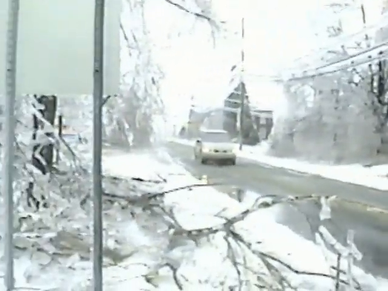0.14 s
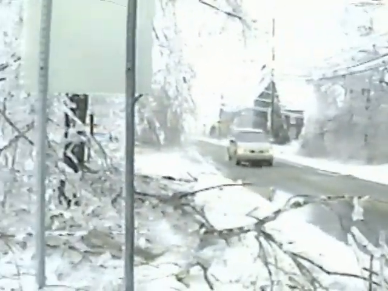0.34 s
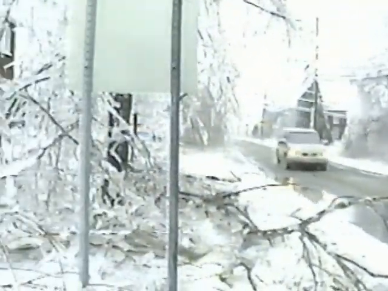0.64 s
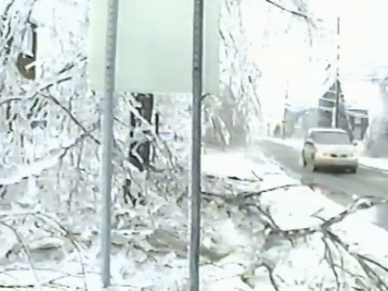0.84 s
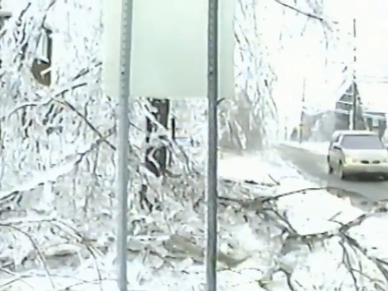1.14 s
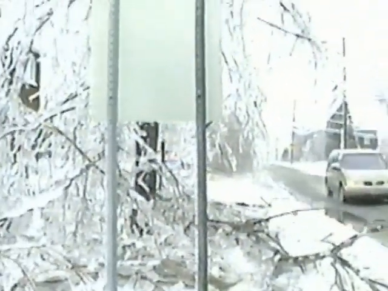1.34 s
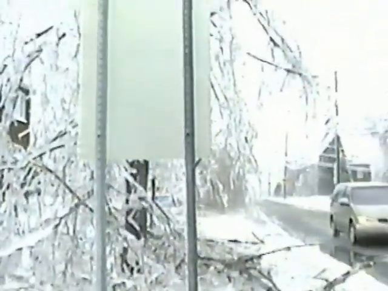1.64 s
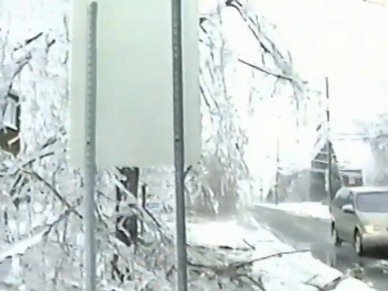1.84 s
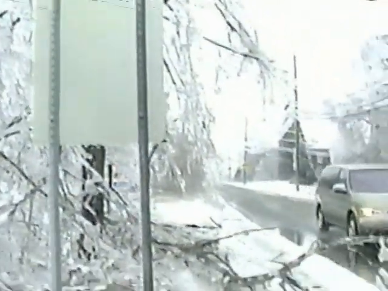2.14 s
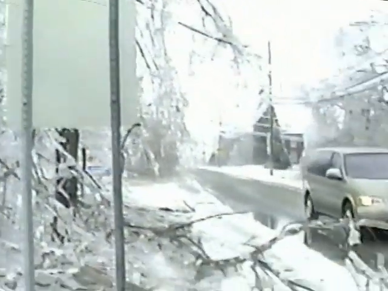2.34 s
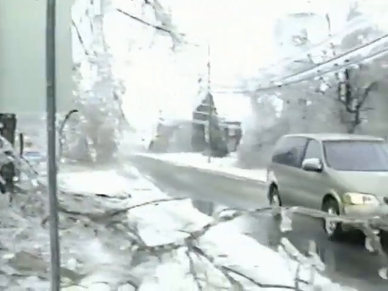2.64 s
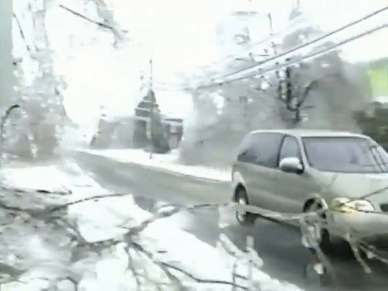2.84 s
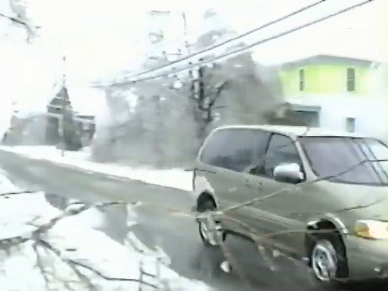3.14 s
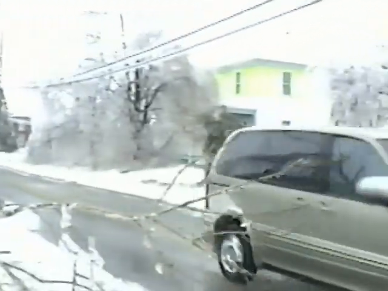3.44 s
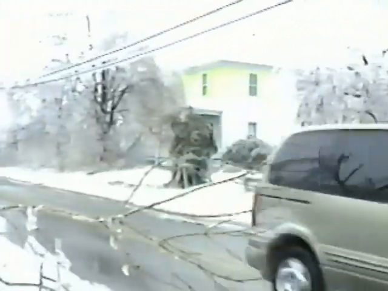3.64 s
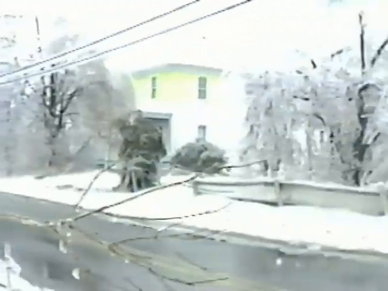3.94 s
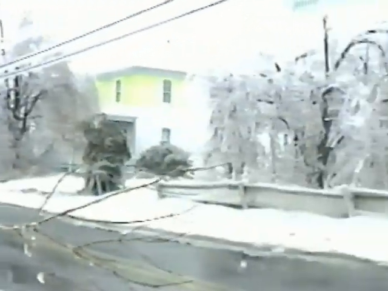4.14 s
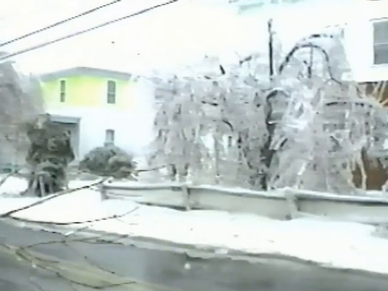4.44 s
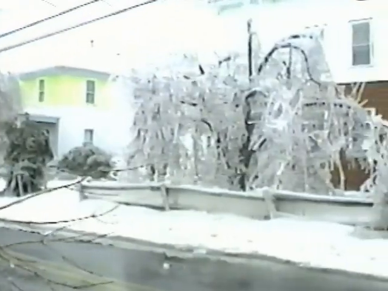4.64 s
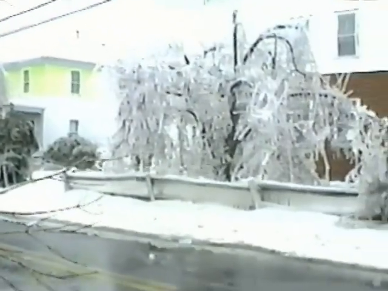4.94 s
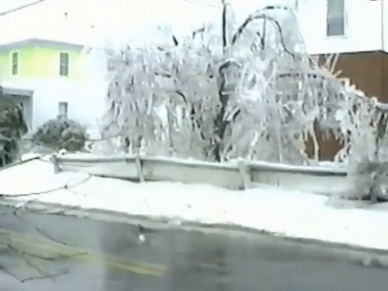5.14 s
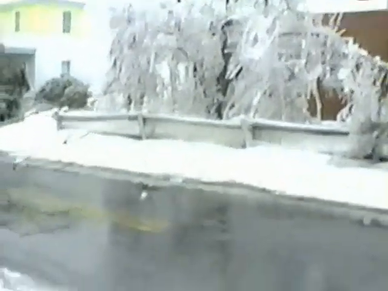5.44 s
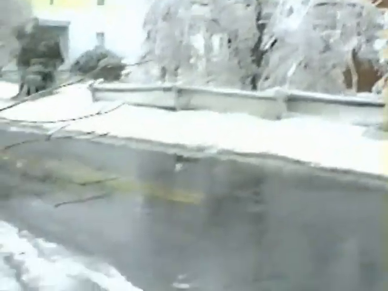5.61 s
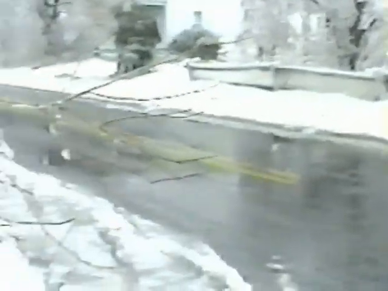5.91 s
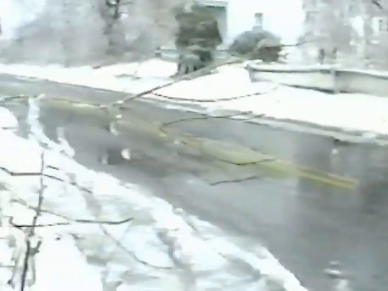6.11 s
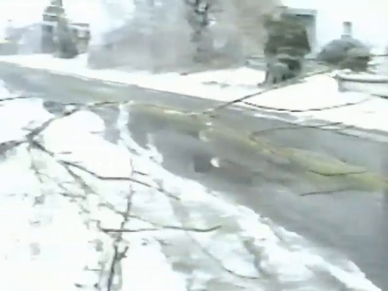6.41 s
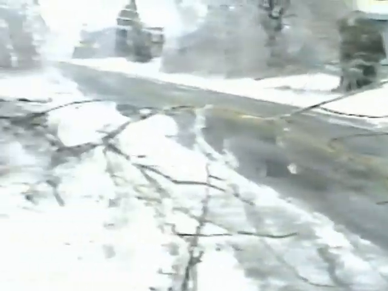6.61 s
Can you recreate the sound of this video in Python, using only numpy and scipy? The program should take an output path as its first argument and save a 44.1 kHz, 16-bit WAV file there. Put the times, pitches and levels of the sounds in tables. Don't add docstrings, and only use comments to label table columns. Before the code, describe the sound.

Wet tyre roar, thrown slush and fine spray rush by at the roadside, while fingers knock a hollow camera body over faint tape buzz.

```python
import sys
import numpy as np
from scipy import signal
from scipy.fft import rfft, irfft, next_fast_len
from scipy.io import wavfile
from scipy.ndimage import uniform_filter1d, map_coordinates

SR = 44100
rng = np.random.default_rng(int(sys.argv[2]) if len(sys.argv) > 2 else 0)


def int16_out(signal):
    q = np.round(np.clip(np.atleast_2d(signal).T, -1, 1) * 32767)
    wavfile.write(sys.argv[1], SR, q.astype(np.int16))


def magnitude_from_level(level_db):
    exponent = np.asarray(level_db, float) / 20
    return 10 ** exponent


N = 298557


def unit(x):
    return x / np.sqrt(np.mean(x ** 2) + 1e-20)


def along(points, hz):
    f, v = np.transpose(points)
    return np.interp(np.log(hz + 1), np.log(f + 1), v)


def wobble(rate):
    knots = rng.standard_normal(int(N * rate / SR) + 4)
    return map_coordinates(knots, [np.arange(N) * rate / SR])


def filtered(x, response):
    m = next_fast_len(N + 8192)
    return irfft(rfft(x, m) * response(np.fft.rfftfreq(m, 1 / SR)), m)[..., :N]


# multiple of the mains frequency, level in dB rms.
HUM_LINES = [(1, -77), (9, -97), (10, -93), (11, -90), (12, -95), (15, -94), (19, -95)]


def mains_hum():
    t = np.arange(N) / SR
    return sum(np.sqrt(2) * magnitude_from_level(db) * np.sin(2 * np.pi * 60.05 * k * t + k) for k, db in HUM_LINES)


# frequency in Hz, density in dB per Hz.
HISS_COLOUR = [(100, -6), (3000, -10), (9000, -4), (12000, -5), (13500, -4), (15000, -30)]


def tape_hiss():
    white = rng.standard_normal(N)
    return magnitude_from_level(-63.5) * unit(filtered(white, lambda hz: magnitude_from_level(along(HISS_COLOUR, hz))))


# frequency in Hz, level in dB rms.
BUZZ_ENVELOPE = [(6000, -95), (8500, -74), (11000, -78), (12700, -79), (13500, -83)]


def head_buzz():
    field_hz, flutter_s = 59.94, 6e-6
    t = np.arange(N) / SR + flutter_s * wobble(12)
    k = np.arange(58, 114)
    line_hz = 2 * k * field_hz
    weak_db = -11 * (k % 2)
    level = magnitude_from_level(along(BUZZ_ENVELOPE, line_hz) + weak_db + rng.normal(0, 1.3, len(k)))
    turn = rng.random(len(k))
    return sum(np.sqrt(2) * g * np.sin(2 * np.pi * (hz * t + u)) for hz, g, u in zip(line_hz, level, turn))


# start in
# seconds, first thud in dB, second thud in dB.
IDLE_THUDS = [(.417, -48, -52), (0.764, -55, -49), (0.996, -52, -48), (1.322, -52, -52),
              (1.439, -54, -55), (1.74, -53, -54), (1.809, -48, -50), (2.134, -49, -53),
              (2.203, -49, -48), (2.295, -48, -50), (2.46, -50, -52), (2.831, -56, -49),
              (3.505, -55, -48), (4.294, -55, -50), (4.712, -49, -70), (4.759, -70, -50),
              (4.897, -54, -48), (5.572, -53, -50), (5.734, -53, -48), (5.803, -48, -48),
              (6.09, -54, -54), (6.547, -54, -50), (6.617, -56, -50)]


def idle_thuds():
    return_s = 0.0464
    s, fall_db, return_db = np.transpose(IDLE_THUDS)
    places = np.round(np.r_[s, s + return_s] * SR).astype(int)
    kicks = np.bincount(places, np.r_[-magnitude_from_level(fall_db), magnitude_from_level(return_db)], N)

    def thud(hz):
        return (hz > 80) * (hz < 480) * (90 / (hz + 1)) ** 1.4 * np.exp(-.4j)

    one_thud = filtered(np.eye(1, N, SR)[0], thud)
    return filtered(kicks, thud) / abs(one_thud).max()


# start in seconds, peak in dB, body note in Hz, 60 dB decay in seconds, shell note in dB.
FINGER_KNOCKS = [(1.2178, -20.5, 204, 0.1, 0.5), (1.5495, -30, 198, 0.071, 1), (1.741, -37, 269, 0.1, -6),
                 (2.297, -30.5, 198, 0.033, 2), (2.472, -34, 243, 0.087, 0), (3.923, -29.5, 174, 0.053, -4),
                 (5.438, -23, 198, 0.052, 3.5), (5.458, -34, 201, 0.044, 3), (5.52, -27, 205, 0.079, -14),
                 (5.62, -35, 169, 0.08, -12), (6.42, -15.5, 176, 0.035, -17)]
# start in seconds, peak in dB.
NAIL_CLICKS = [
    (1.2179, -12),
    (1.5492, -19),
    (5.437, -26),
]
# frequency in Hz, level in dB.
NAIL_RINGS = [
    (520, -2),
    (1100, -3),
    (1750, -2),
]


def knocks():
    out, t = np.zeros(N + SR), np.arange(SR // 4) / SR
    for s, db, hz, t60, shell_db in FINGER_KNOCKS:
        body = np.sin(2 * np.pi * hz * t) * magnitude_from_level(-60 * t / t60) * (1 - np.exp(-t / 0.0081))
        shell = np.sin(2 * np.pi * 320 * t) * magnitude_from_level(shell_db + 2.5 - 60 * t / 0.015)
        out[round(s * SR):][:len(t)] -= magnitude_from_level(db + 2.5) * (body + shell)
    ring = sum(magnitude_from_level(db) * np.sin(2 * np.pi * hz * t) for hz, db in NAIL_RINGS)
    click = ring * magnitude_from_level(-60 * t / .006) * (1 - np.exp(-t / .0002))
    for s, db in NAIL_CLICKS:
        out[round(s * SR):][:len(t)] -= magnitude_from_level(db) * click
    return signal.sosfilt(signal.butter(3, 135, "high", fs=SR, output="sos"), out[:N])


def droplets(per_s, spread_db, share):
    hit = rng.random(N) < per_s / SR
    size = magnitude_from_level(spread_db * np.minimum(rng.exponential(size=N), 4)) * rng.standard_normal(N)
    return np.sqrt(1 - share) * rng.standard_normal(N) + np.sqrt(share) * unit(hit * size)


def rush(source, spectrum, patchy_db, horn=None):
    hz, t, z = signal.stft(source, SR, nperseg=512)
    field = uniform_filter1d(rng.standard_normal(z.shape), size=7, axis=0)
    field = uniform_filter1d(field, size=12, axis=1)
    z = z * magnitude_from_level(patchy_db * unit(field) + along(spectrum, hz)[:, None])
    if horn:
        before = np.sqrt(np.sum(abs(z) ** 2, axis=0))
        z = z * magnitude_from_level(horn(hz[:, None], t))
        z = z * before / np.sqrt(np.sum(abs(z) ** 2, axis=0) + 1e-30)
    return unit(signal.istft(z, SR, nperseg=512)[1][:N])


def ridge(centre, times, height_db, width):
    def response_db(hz, t):
        distance = np.log((hz + 1) / np.interp(t, times, centre)) / width
        return np.interp(t, times, height_db) * np.exp(-distance ** 2)
    return response_db


# frequency in Hz, density in dB per Hz.
RUMBLE_COLOUR = [(35, -58), (60, -37), (225, 6.5), (287, -3.5), (336, 1), (373, -6.5), (750, -5.5),
                 (980, 0.5), (1650, -120)]


def rumble(level_db):
    return magnitude_from_level(level_db + 0.52 * wobble(27)) * rush(rng.standard_normal(N), RUMBLE_COLOUR, patchy_db=1.5)


# frequency in Hz, density in dB per Hz.
SPRAY_COLOUR = [(2710, -10), (4600, -2.5), (5660, -3), (7650, -8), (9630, -8), (13500, -37.5)]


def spray(level_db, surge, mist):
    drops = droplets(5000, spread_db=5, share=0.2)
    return magnitude_from_level(level_db + 0.99 * surge + 1.3 * wobble(22.21)) * rush(drops, SPRAY_COLOUR, 1.6, mist)


# frequency in Hz, density in dB per Hz.
SLUSH_COLOUR = [(1240, -40.5), (2100, -2), (3760, -1.5), (4450, -6), (5000, -12.5), (5600, -16.5),
                (7280, -22.5), (12300, -120)]


def slush(level_db, surge, arch):
    lumps = droplets(4000, spread_db=3.9, share=.08)
    return magnitude_from_level(level_db + 0.75 * surge + 0.46 * wobble(25)) * rush(lumps, SLUSH_COLOUR, 0.9, arch)


# frequency in Hz, density in dB per Hz.
TREAD_COLOUR = [(260, -28), (450, -11), (571, -8.5), (1230, 0.5), (1910, 0.5), (2400, -5), (2900, -13),
                (3200, -11.5), (4160, -12), (7040, -120)]


def tread(level_db, surge, horn):
    slaps = droplets(3000, spread_db=2.8, share=0.055)
    return magnitude_from_level(level_db + 1.5 * surge) * rush(slaps, TREAD_COLOUR, 0.94, horn)


FLING_STRENGTH = [1.32, 5.5, -1]


def wheel_fling(t):
    turns_per_s, fling_s, sharpness = 2.98, 0.086, 0.37
    fling = np.exp(sharpness * (np.cos(2 * np.pi * turns_per_s * (t - fling_s)) - 1))
    return np.outer(FLING_STRENGTH, fling - fling.mean())


# middle in seconds, water in dB, length in seconds.
WET_PATCHES = [(2.12, 1.5, 0.045), (2.2, -0.5, 0.037), (2.35, 2.2, 0.07), (2.65, -5.5, 0.072),
               (2.86, 4.5, 0.047), (3.2, 1.5, 0.066), (3.5, -.5, .08), (3.745, 1.5, 0.044),
               (3.893, -3, .05), (4.79, 1.8, .05), (4.94, -2.5, 0.069), (6.095, 2, 0.043)]
WET_SHARE = [0.52, 0.66, 0.85]


def puddles(t):
    water_db = sum(db * np.exp(-((t - at) / length) ** 2) for at, db, length in WET_PATCHES)
    return np.outer(WET_SHARE, water_db)


# time in seconds, nearness in dB, wetness of the lane in dB,
# fineness of the mist in dB per octave, engine load in dB.
VAN_PASS = [(0, -30.5, 6, 0, -50), (.35, -32, 1, 11.5, -44), (.75, -31.5, -1.5, 15, -43),
            (1.2, -33.5, 1.5, 1, -42.5), (1.26, -32.5, -3.5, 3, -42.5), (1.6, -32, -5.5, 9, -42),
            (2.0, -28, -4, -5, -43), (2.4, -27.5, -2, -6, -47.5), (2.9, -28.5, -1.5, -7.5, -44.5),
            (3.4, -28.5, 0, -3, -47.5), (3.85, -29.5, 4, -3, -47), (4.25, -30, 1.5, 8, -42),
            (4.7, -29.5, 0.5, 8, -43), (5.2, -29.5, -4.5, 10, -41.5), (5.7, -30.5, -8, 13, -43),
            (6.15, -32.5, -9, 10, -43), (6.5, -34.5, -6.5, -1, -43), (6.77, -35, -6, -4, -47)]
# time in seconds, tread horn in Hz, horn focus in dB,
# wheel arch in Hz, arch focus in dB.
VAN_ASPECT = [(0, 1500, 3, 2820, 5.5), (.7, 1690, 4.5, 2700, 2.5), (1.2, 1820, 1.5, 2750, 0.5),
              (1.9, 1920, 6, 2730, 5.5), (2.6, 1950, 5, 2700, 6), (3.2, 2040, 4, 2830, 4.5),
              (3.62, 2120, 5, 2830, 5), (3.9, 1470, 3, 2880, 6), (4.4, 1290, 5, 2690, 5.5),
              (5.0, 1430, 3.5, 2640, 7), (5.4, 1560, 2, 2480, 10), (5.7, 1550, 5.5, 2530, 4.5),
              (6.05, 1640, 5, 2600, 4.5), (6.3, 1610, 2.5, 2980, 7), (6.77, 1500, 2, 2880, 4)]


def van():
    t = np.arange(N) / SR
    s, near_db, wet_db, fine, load_db = np.transpose(VAN_PASS)
    near_db, wet_db, load_db = [np.interp(t, s, c) for c in (near_db, wet_db, load_db)]
    tread_db, slush_db, spray_db = near_db + wheel_fling(t) + puddles(t)
    slush_db = slush_db + 0.64 + 0.11 * wet_db - 0.76 * t
    spray_db = spray_db - 13 + wet_db
    surge = .5 * wobble(18) + .5 * wobble(45)
    times, horn_hz, horn_db, arch_hz, arch_db = np.transpose(VAN_ASPECT)
    horn = ridge(horn_hz, times, horn_db, width=0.19)
    arch = ridge(arch_hz, times, arch_db, width=0.11)

    def mist(hz, t):
        return np.interp(t, s, fine) * np.log2(np.clip(hz, 6300, 11500) / 7800)

    wheels = tread(tread_db, surge, horn) + slush(slush_db, surge, arch) + spray(spray_db, surge, mist)
    return wheels + rumble(load_db)


# start in seconds, depth in dB, recovery in seconds.
GAIN_DUCKS = [
    (1.22, -6, 0.43),
    (2.45, -1, 0.26),
]


def scene():
    t = np.arange(N) / SR
    duck_db = 0
    for s, db, recovery in GAIN_DUCKS:
        duck_db = duck_db + db * np.exp(-np.clip(t - s, 0, None) / recovery) * np.clip((t - s) / 0.0034, 0, 1)
    return np.array([magnitude_from_level(duck_db) * van() + knocks(), np.zeros(N)])


# middle in seconds, treble loss in dB, length in seconds.
TAPE_LIFTS = [
    (0.949, -6, .008),
    (1.824, -11, 0.011),
    (2.452, -11, 0.0085),
    (4.003, -12, 0.013),
    (5.291, -4, 0.0076),
]


def dropouts(x):
    t = np.arange(N) / SR
    lift_db = sum(db * np.exp(-((t - s) / length) ** 4 * 16) for s, db, length in TAPE_LIFTS)
    treble = filtered(x, lambda hz: 1 / (1 + (1500 / (hz + 1)) ** 2))
    return x - treble * (1 - magnitude_from_level(lift_db))


# start in seconds, end in seconds.
BASS_GAPS = [(.03, .13), (.5, .56), (2.35, 2.46), (3.32, 3.51), (3.56, 3.7), (3.76, 3.9), (4.13, 4.23)]


def bass_loss(tape):
    t = np.arange(N) / SR
    low = filtered(tape, lambda hz: (hz > 75) * (hz < 175))
    weak = sum((t > a) * (t < b) for a, b in BASS_GAPS)
    return tape - 0.99 * low * uniform_filter1d(weak * 1., size=1024)


COPY_OFFSET = [
    [.1269],
    [.123],
]


def low_pass(x):
    return signal.sosfilt(signal.butter(12, 14230, fs=SR, output="sos"), x)


def record(dry):
    t = np.arange(N) / SR
    tape = dropouts(dry[0]) + tape_hiss() + head_buzz()
    tape = filtered(tape, lambda hz: (hz > 55) * np.where(hz < 13580, 1, magnitude_from_level(-24)))
    tape = bass_loss(tape)
    tape = tape / (1 + abs(tape / .3) ** 4) ** .25
    hum = mains_hum()
    whine = magnitude_from_level(-90) * np.sin(2 * np.pi * 8000.5 * t)
    crosstalk = magnitude_from_level(-49) * tape + magnitude_from_level(-73.5) * rng.standard_normal(N)
    idle = filtered(crosstalk, lambda hz: (hz > 510) * (hz < 11300)) + hum + whine + idle_thuds()
    return low_pass(np.array([magnitude_from_level(6) * tape + 3.8 * hum, idle]) + COPY_OFFSET)


dry = scene()
out = record(dry)
int16_out(out)
```